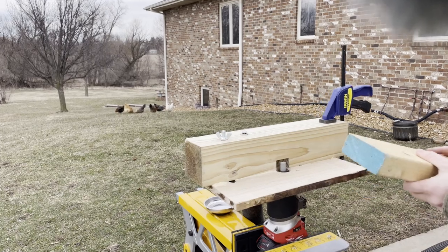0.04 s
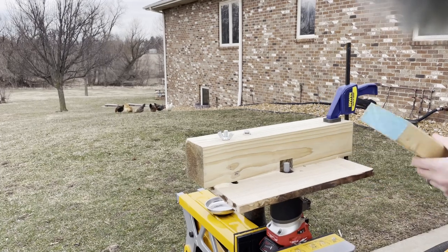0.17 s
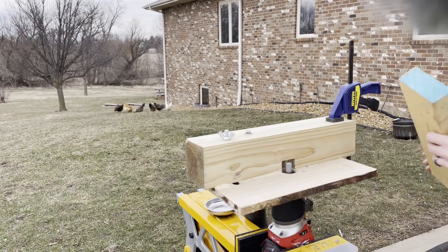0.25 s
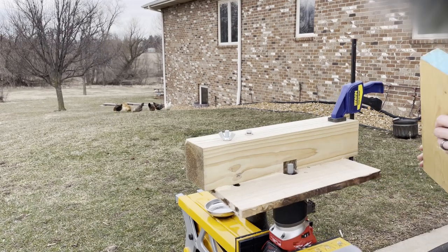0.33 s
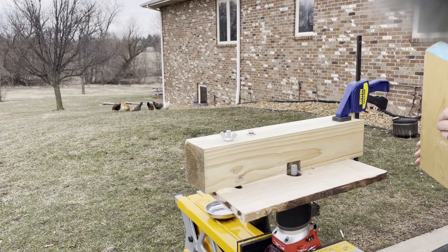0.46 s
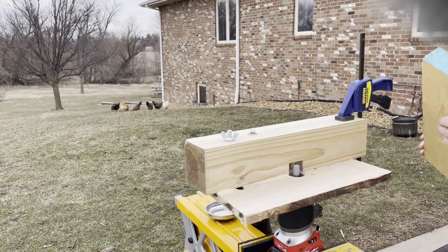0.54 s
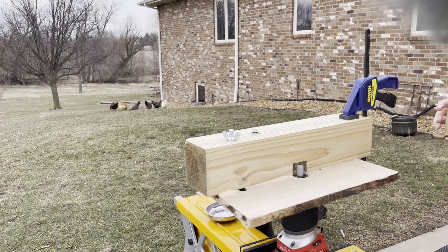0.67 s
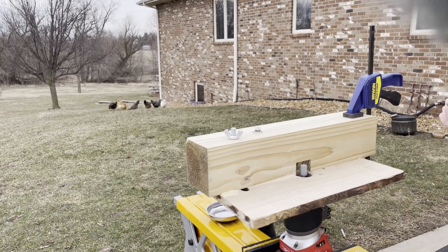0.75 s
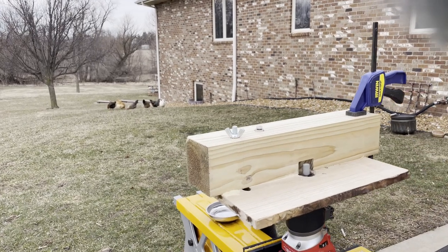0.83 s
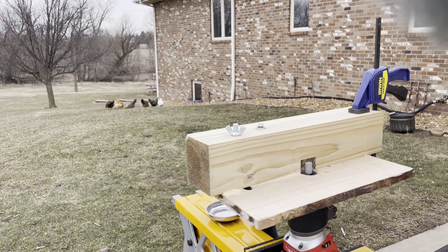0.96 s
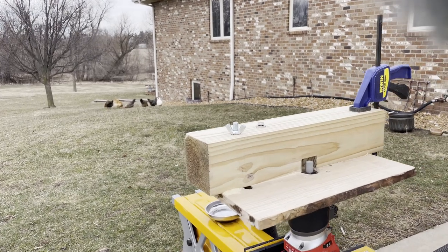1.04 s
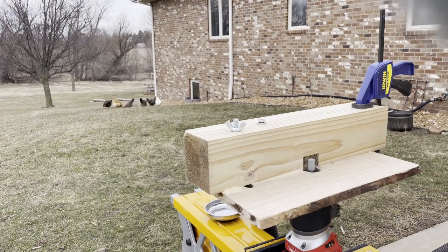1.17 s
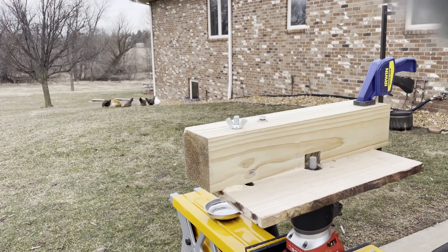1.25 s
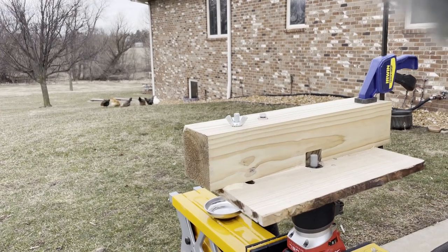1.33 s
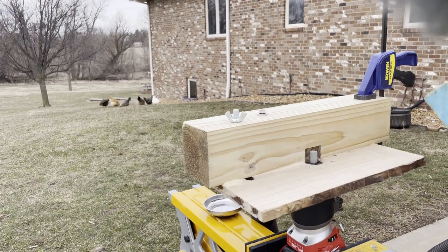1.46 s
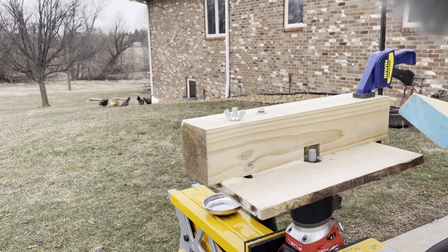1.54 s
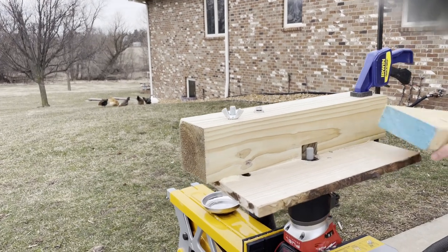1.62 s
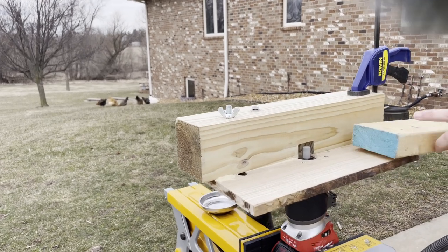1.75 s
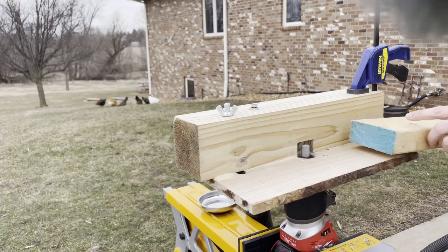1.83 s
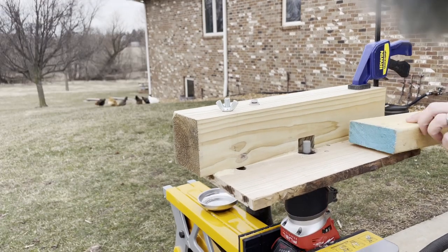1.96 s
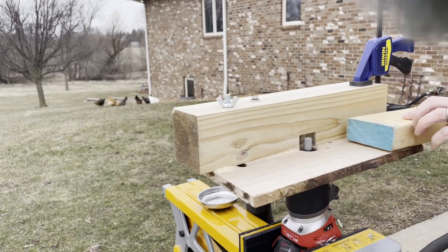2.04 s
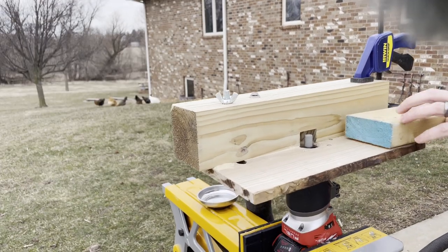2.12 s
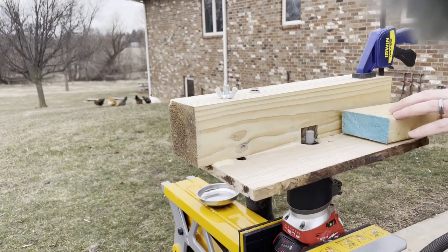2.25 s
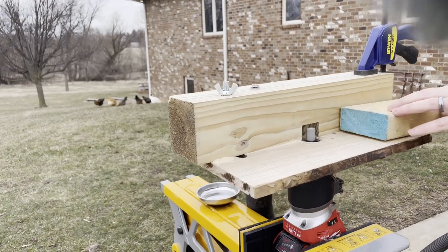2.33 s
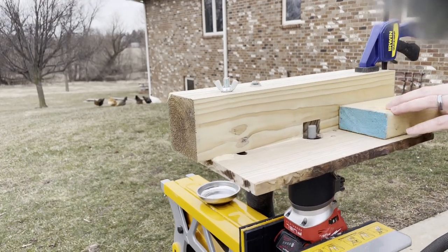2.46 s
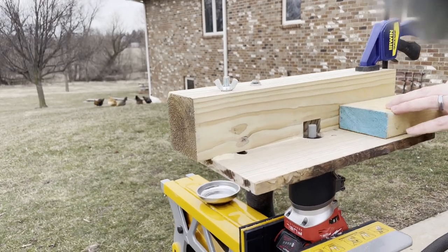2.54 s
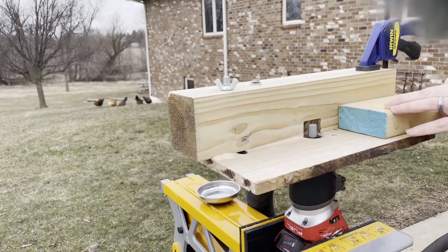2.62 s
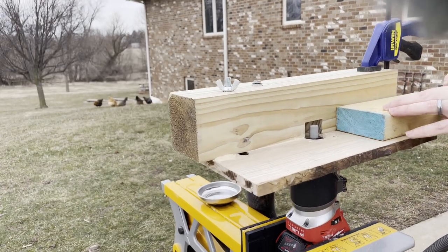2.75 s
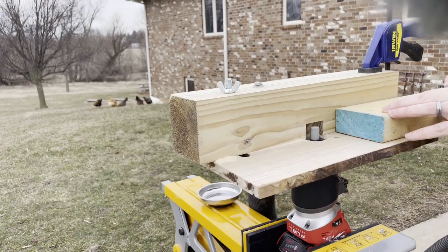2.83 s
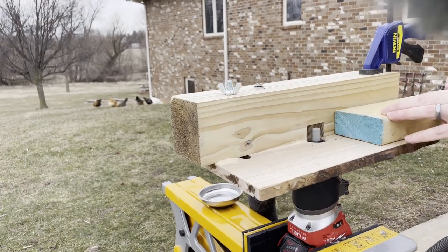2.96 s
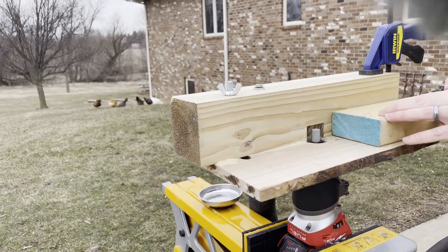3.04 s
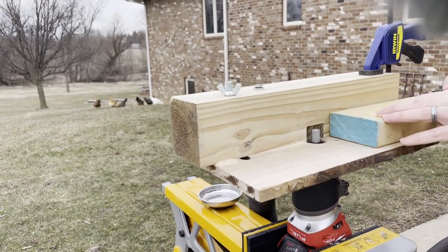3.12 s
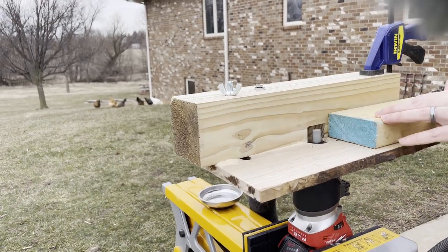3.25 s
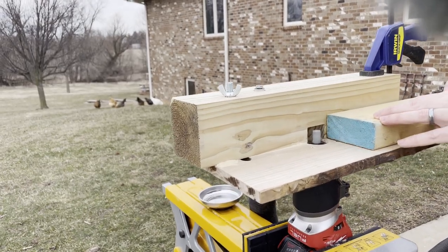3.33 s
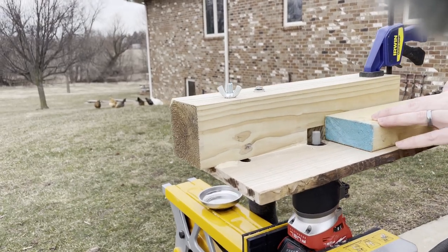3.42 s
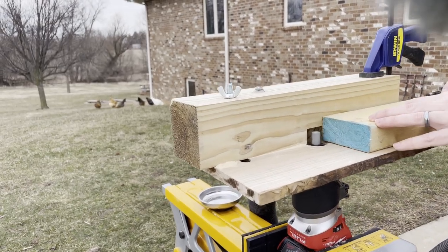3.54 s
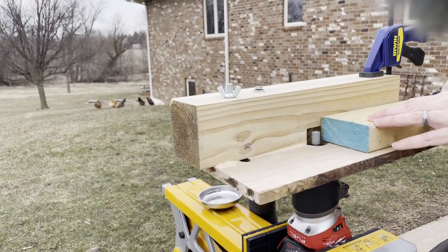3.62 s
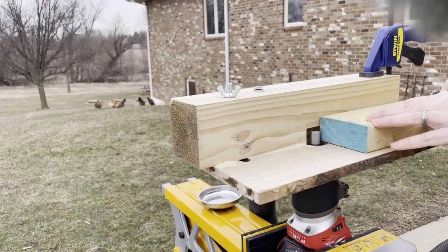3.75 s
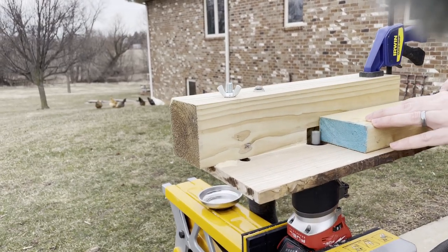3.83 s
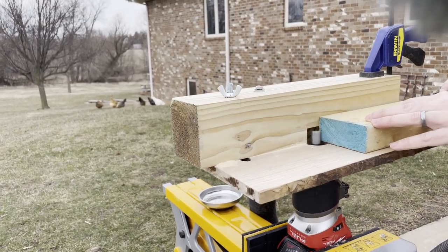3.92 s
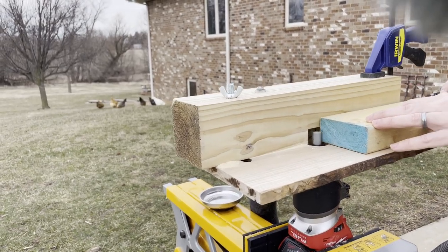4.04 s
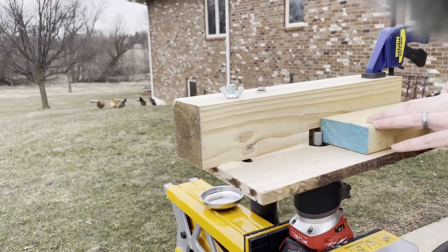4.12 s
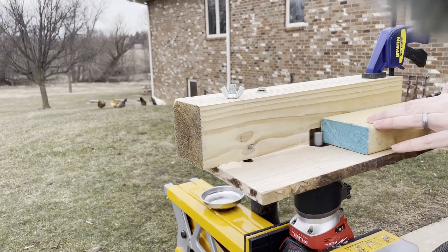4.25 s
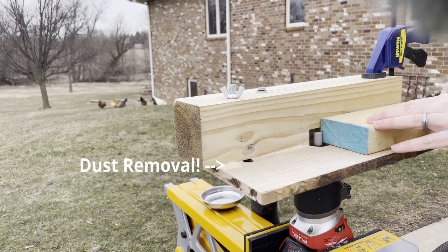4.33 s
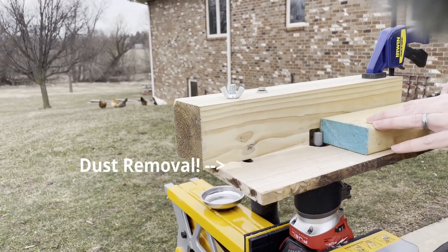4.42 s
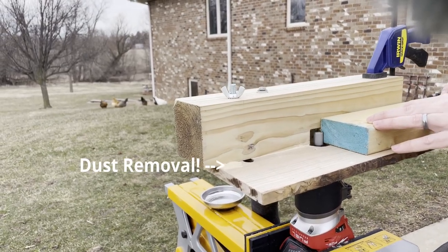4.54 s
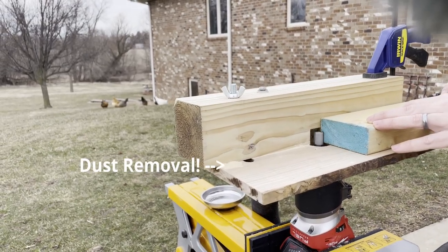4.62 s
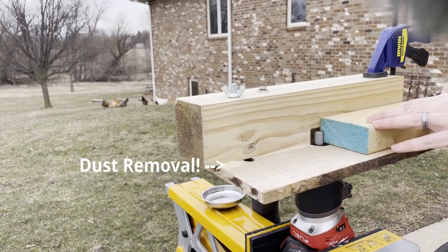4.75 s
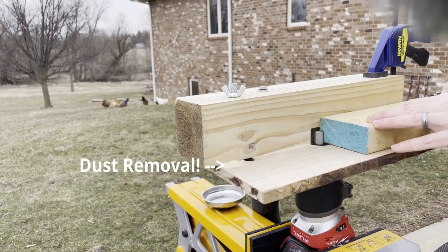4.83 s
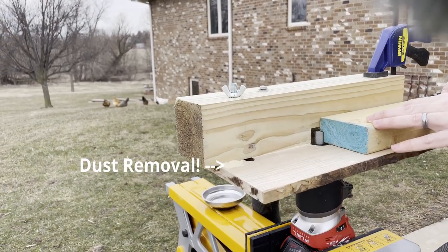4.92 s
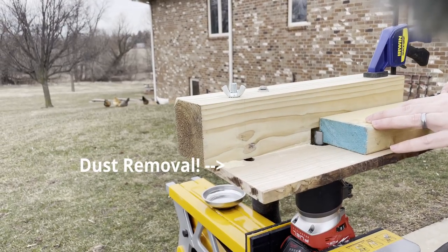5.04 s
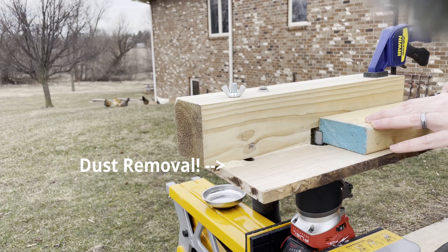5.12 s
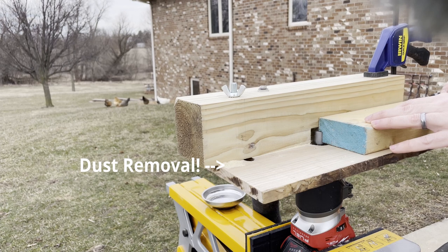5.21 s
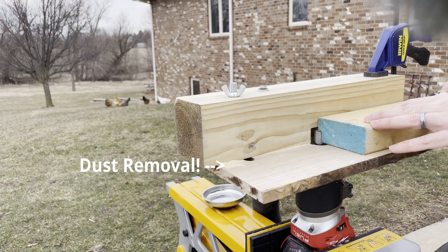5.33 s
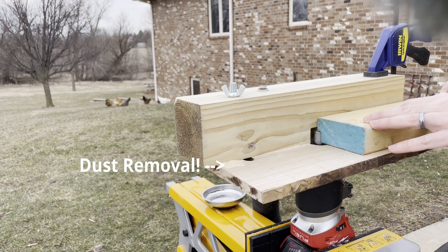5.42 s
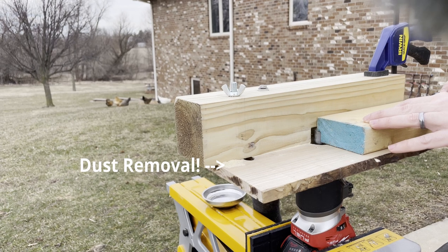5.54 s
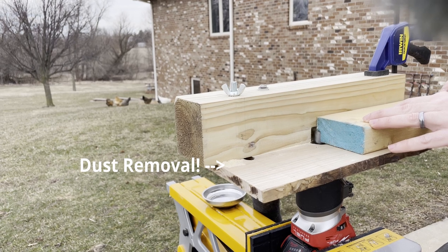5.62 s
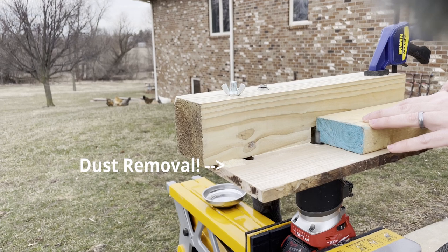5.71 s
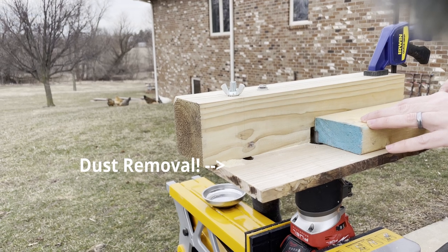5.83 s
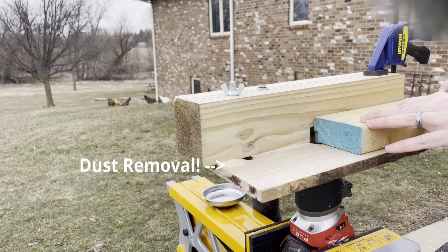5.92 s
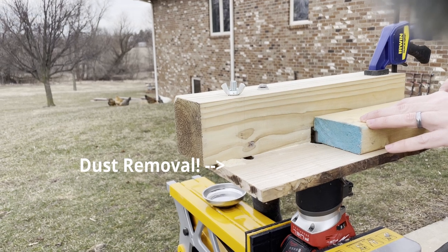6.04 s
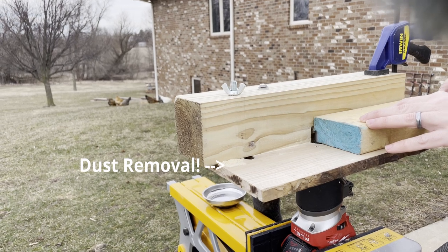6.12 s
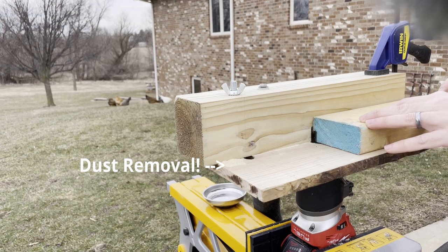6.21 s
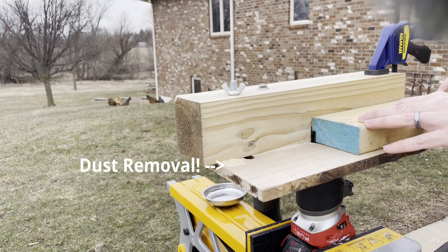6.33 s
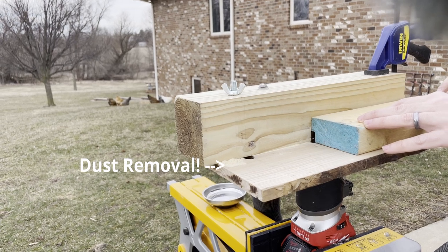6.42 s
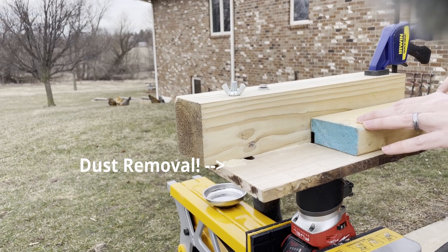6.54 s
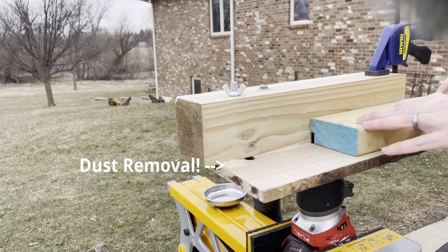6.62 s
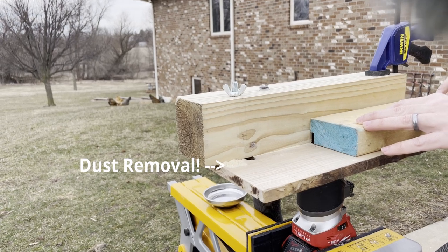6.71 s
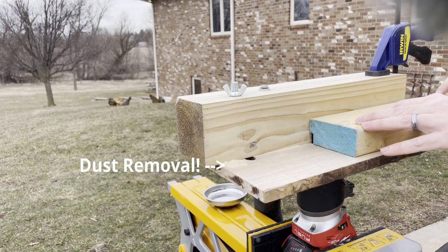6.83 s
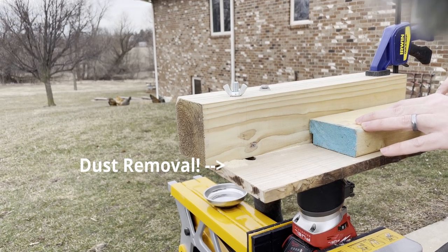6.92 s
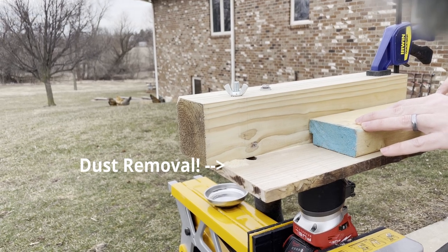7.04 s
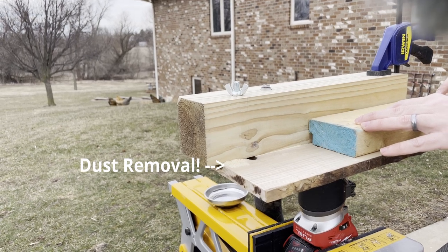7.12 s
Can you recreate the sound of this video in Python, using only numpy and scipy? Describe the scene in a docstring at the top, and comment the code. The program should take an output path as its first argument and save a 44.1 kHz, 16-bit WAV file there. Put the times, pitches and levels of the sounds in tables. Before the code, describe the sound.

Outdoors, close to a phone-like microphone with little bass, a small cordless router runs freely from 0 s: a steady high whine inside a broad, airy fan rush that swells slightly over the first two seconds. At about 1.8 s a board lands on the wooden table with soft, dull knocks, the last near 2 s. As it approaches, the whipped air grows hissier, especially from 2.5 to 3.5 s. At 3.87 s the bit bites with a crack and a brief surge; a loud, nasal, buzzing cut covers the whine and slides down in pitch, quickly, then gradually. From 4.7 s the board chatters, with rough snagging until 5.9 s, then another rattle from 6 s becoming rounder wobbling until 6.75 s. Fibres tear and bright splinters snap, notably around 5.4 and 6.2 to 6.5 s. The cut ends smoother, still buzzing, at about 7.1 s. A faint low hum and outdoor rumble lie beneath throughout.

```python
"""Trim router biting into a board

A cordless trim router spins under a home-made table outdoors; its fan rushes and its two-flute bit whines.
A board knocks softly onto the table and slides up to the bit; the flutes strike it as the motor slows.
The board chatters for a while, then the cut runs smooth. Harmonics of one shaft angle make whine and cut;
shaped noise makes air, tearing and splinters. A faint low hum and outdoor rumble lie underneath."""
import sys
import numpy as np
from scipy import signal
from scipy.fft import rfft, irfft, next_fast_len
from scipy.io import wavfile
from scipy.ndimage import uniform_filter1d, minimum_filter1d

SR = 44100
rng = np.random.default_rng(int(sys.argv[2]) if len(sys.argv) > 2 else 0)


def dump_mix(stems):
    """Bounce the given channels to the path in sys.argv[1] as a 16-bit WAV at rate SR."""
    frames = np.atleast_2d(stems).T  # one column per channel
    limited = np.clip(frames, -1, 1)  # hard clip at full scale
    pcm = np.round(limited * 32767).astype(np.int16)
    wavfile.write(sys.argv[1], SR, pcm)


N = 316197

# tone of the flutes at full depth: shaft_multiple, level_db (relative)
DEEP_TONE = [(1, -30.5), (2, -11.5), (3, -24), (4, -2), (5, -18.5), (6, -4.5), (7, -7), (8, -14), (9, -1.5),
             (10, -12), (11, -5.5), (12, -1), (13, -8.5), (14, -8), (15, -14), (16, -8.5), (17, -17),
             (18, -7.5), (19, -21), (20, -17), (21, -21), (22, -16.5), (23, -56), (24, -21), (25, -20),
             (26, -15.5), (27, -11), (28, -20), (29, -11), (30, -24), (31, -23), (32, -20.5), (33, -41),
             (34, -37), (35, -34), (36, -30), (37, -22), (38, -38)]


def undb(db):
    """Decibels to gain."""
    return np.exp(np.asarray(db) * (np.log(10) / 20))


def unit(x):
    """Scale to rms 1."""
    return x / np.sqrt(np.mean(np.abs(x) ** 2))


def curves(rows):
    """Each column of a timed table, sample by sample."""
    s, *columns = np.transpose(rows)
    return [np.interp(np.arange(N) / SR, s, c) for c in columns]


def walk(rate):
    """Smooth random wandering of spread 1, with about rate new targets per second."""
    k = max(int(SR / rate), 2)
    steps = np.repeat(rng.standard_normal(N // k + 1), k)
    return unit(uniform_filter1d(steps, k)[:N])


def noise(points):
    """Noise of rms 1 with a (Hz, dB) colour that falls 30 dB per octave outside its points."""
    hz, db = np.transpose(points)
    size = next_fast_len(N)
    octave = np.log2(np.arange(size // 2 + 1) * SR / size + 1)
    knots = np.log2(hz)
    outside = np.abs(octave - np.clip(octave, knots[0], knots[-1]))
    gain = undb(np.interp(octave, knots, db) - 30 * outside)
    return unit(irfft(rfft(rng.standard_normal(size)) * gain, size)[:N])


def free_running(angle, load, whine_db=-48, fan_db=-41.5, whipped_db=-49.5, flutter_db=1.4,
                 smear_rad=0.093, bearing_smear_rad=0.47, chop=0.22,
                 loaded_whine_db=-26, loaded_air_db=-9):
    """Bit, motor and bearings whine over the cooling fan; all fade once the wood loads the bit."""
    # whine of the free bit and motor: shaft_multiple, level_db (relative)
    whine = [(1, -11), (2, 0), (4, -2.5), (5, -15), (6, -17), (8, -2), (9, -17), (10, -18), (12, -10),
             (16, -22), (28, -19), (32, -33)]
    # faint bearing tones between the multiples: shaft_multiple, level_db (relative)
    bearings = [(3.18, -15), (5.83, -21), (6.17, -10), (7.19, -11), (7.37, -17), (8.365, -23), (9.89, -13),
                (13.34, -16.5), (18.78, -28)]
    # colour of the fan's rush: pitch_hz, level_db (per Hz, relative)
    fan = [(330, -23), (500, -12.5), (800, -9), (1200, -6), (1900, -4.5), (3000, -9), (3800, -12.5),
           (4600, -11), (5800, -19), (7000, -17), (8300, -26), (10000, -20.5), (12000, -27.5),
           (15500, -38.5)]
    # colour of the air the bit stirs in front of the fence: pitch_hz, level_db (per Hz, relative)
    whipped_air = [(600, -13), (1100, -4.5), (1600, 0.5), (2400, -4.5), (4000, -12.5), (6500, -23.5),
                   (12000, -24)]
    # the board slides up to the bit: time_s, gap_cm
    approach = [(1.8, 26), (2.5, 16), (2.9, 4.5), (3.4, 3.5), (3.5, .6), (3.87, 0.5)]

    tones = 0
    for k, db in whine:
        tones = tones + undb(db + flutter_db * walk(18)) * np.cos(k * angle + smear_rad * walk(40))
    for k, db in bearings:
        tones = tones + undb(db) * np.cos(k * angle + bearing_smear_rad * walk(20))
    tones = np.sqrt(2) * tones * undb(whine_db + loaded_whine_db * load)
    # whipped air grows up to 10.5 dB louder as the gap closes, mostly within 5.5 cm
    closeness = np.exp(-curves(approach)[0] / 5.5)
    whipped = noise(whipped_air) * undb(whipped_db + 10.5 * closeness)
    # each of the two flutes chops the air once a turn
    rush = (noise(fan) * undb(fan_db) + whipped) * (1 + chop * np.cos(2 * angle))
    # starts 2.5 dB quieter and swells to full level over 1.9 s
    opening_db = -2.5 * np.clip(1 - np.arange(N) / SR / 1.9, 0, 1)
    return (tones + rush * undb(loaded_air_db * load)) * undb(opening_db)


def cutting(angle, speed, depth):
    """The tone of the flutes, with the beating, rattling and tearing of the chattering board."""
    shake, rate, beat_db, rattle_db, rocking = bouts()
    rocking = np.clip(rocking, 0, 1)
    force_db = 2 * walk(30)  # catches differ in force
    slip, swing = catching(rate, rocking)
    # random starting phase of each multiple (radians), which softens the blows
    phases = 1.85 * rng.standard_normal(len(DEEP_TONE) + 2)
    return (flutes(angle, speed, depth, phases, shake, swing, rocking)
            + shake * beating(angle, phases, slip, swing, rocking, beat_db + force_db)
            + rattling(angle, depth, shake, swing, rattle_db + force_db)
            + tearing(angle, depth, shake, swing, force_db))


def flutes(angle, speed, depth, phases, shake, swing, rocking, tone_db=-33.5, tone_shimmer_db=0.72,
           shimmer_db=2.05, grain_db=2, buzz_trim_db=0.4, sizzle_trim_db=-1,
           jitter_rad=0.022, uneven=0.13, snag_db=7):
    """Each flute strikes once a turn; one bites deeper, adding odd multiples; depth sets the tone."""
    # tone of the flutes at the first nick: shaft_multiple, level_db (relative)
    nick_tone = [(1, -20), (2, -10.5), (3, -22), (4, -9), (5, -8), (6, -3), (7, -21), (8, -6), (9, -12),
                 (10, -7.5), (11, -15), (12, -11), (13, -20), (14, -16), (15, -31), (16, -30), (17, -40),
                 (18, -19), (19, -37), (20, -40), (21, -24), (22, -35), (23, -30), (24, -26), (25, -30),
                 (26, -31), (27, -33), (28, -36), (29, -43), (30, -45), (31, -37), (32, -45), (33, -43),
                 (34, -34), (35, -44), (36, -90.5), (37, -97), (38, -99)]
    # tone of the flutes in a shallow cut: shaft_multiple, level_db (relative)
    shallow_tone = [(1, -32.5), (2, -12.5), (3, -24), (4, -0.5), (5, -28), (6, -1.5), (7, -8.5), (8, -7),
                    (9, -18.5), (10, -10.5), (11, -17), (12, -12), (13, -24.5), (14, -13.5), (15, -26),
                    (16, -24), (17, -29), (18, -20.5), (19, -40), (20, -22), (21, -30), (22, -29.5),
                    (23, -20.5), (24, -22), (25, -35), (26, -19), (27, -38), (28, -22.5), (29, -32),
                    (30, -21), (31, -29), (32, -27), (33, -37), (34, -45), (35, -38), (36, -30), (37, -45),
                    (38, -48)]
    # treble of the cut, before the trims: time_s, buzz_db (multiples 10-19), sizzle_db (20 and up)
    treble = [(3.89, -34.5, -47), (3.98, -45.5, -48), (4.08, -36.5, -46.5), (4.29, -40.5, -49.5),
              (4.68, -40.5, -42.5), (4.99, -41, -49.5), (5.13, -37.5, -44.5), (5.32, -41, -50),
              (5.34, -43, -44.5), (5.55, -39, -51), (6.0, -36.5, -43), (6.09, -38, -48), (6.29, -38, -46.5),
              (7.15, -35.5, -44)]

    # depths (0-1) of the nick, of the shallow tone from and to, and of the deep tone
    stages = [0, 0.28, 0.64, 0.9]
    gains = {}
    for (k, nick), (_, shallow), (_, deep) in zip(nick_tone, shallow_tone, DEEP_TONE):
        gains[k] = undb(np.interp(depth, stages, [nick, shallow, shallow, deep]))
    # the depth colours each treble band, the table sets its level
    buzz_db, sizzle_db = curves(treble)
    buzz_power = sum(g ** 2 for k, g in gains.items() if 10 <= k < 20)
    sizzle_power = sum(g ** 2 for k, g in gains.items() if k >= 20)
    buzz_gain = undb(buzz_db + buzz_trim_db) / np.sqrt(buzz_power)
    sizzle_gain = undb(sizzle_db + sizzle_trim_db) / np.sqrt(sizzle_power)

    # a shaking board meets each flute early or late, hard or soft, and hardest as it snags
    timing = jitter_rad * shake * walk(250)
    force = (1 + uneven * shake * walk(300)) * undb(snag_db * swing * shake * (1 - rocking))
    # the deeper flute loses its lead: 9.75 dB snagging, 3.25 dB rocking, and more as the board rocks away
    odd_gain = undb((-9.75 + 6.5 * rocking - 14 * swing * rocking) * shake)
    out = 0
    for k, gain in gains.items():
        if k < 10:
            gain = gain * pocket(k * speed) * undb(tone_db + tone_shimmer_db * walk(7.7))
        elif k < 20:
            gain = gain * buzz_gain * undb(shimmer_db * walk(9))
        else:
            gain = gain * sizzle_gain * undb(shimmer_db * walk(9) + grain_db * walk(45))
        if k > 6:
            gain = gain * force * (odd_gain if k % 2 else 1)
        out = out + gain * np.cos(k * angle + phases[k] + k * timing)
    return np.sqrt(2) * out


def pocket(hz):
    """Gain of the pocket round the bit; the multiples slide through its peaks as the motor slows."""
    # peaks and dips: centre_hz, half_width_hz, level_db
    resonances = [(802.6, 20.2, -21), (852, 18, 5), (779, 51, 5), (1582, 73, 4), (2307, 53, -10),
                  (2470, 34, 2), (2678, 71, 8), (3387, 100, 3)]
    return undb(sum(db * np.exp(-((hz - centre) / width) ** 2) for centre, width, db in resonances))


def bouts(fade_s=0.034):
    """Shake of the board (0-1), then catch rate, beating, rattle and rocking, drifting between bouts."""
    # bouts of chatter: start_s, end_s, build_up_s, catch_rate_hz, beating_db, rattle_db (before swells),
    # rocking (0 snags, 1 rocks roundly)
    chatter = [(4.7, 5.15, .14, 39, -32.5, -45.5, 0.13), (5.155, 5.887, .03, 27, -35, -36.5, 0),
               (6.0, 6.291, 0.027, 28, -35, -34.5, 0.53), (6.3, 6.76, .03, 26, -34, -47, 0.88)]
    t = np.arange(N) / SR
    shake = 0
    for start, end, rise, *_ in chatter:
        # half open at the start and end times
        gate = np.minimum((t - start) / rise, (end - t) / fade_s) + .5
        shake = shake + np.clip(gate, 0, 1)
    manners = [((start + end) / 2, *manner) for start, end, _, *manner in chatter]
    return np.minimum(shake, 1), *curves(manners)


def catching(rate, rocking, release=0.029):
    """The board catches and springs off unevenly: cycles slipped behind the bit, and swing about zero."""
    slip = np.cumsum(rate * (1 + .1 * walk(25))) / SR
    # a snag builds up and lets go at once; rocking swells and fades evenly
    build_up = uniform_filter1d((slip - release) % 1, size=150)
    snag = np.sqrt(build_up.clip(0)) - 2 / 3
    rock = .5 * np.cos(2 * np.pi * slip)
    return slip, (1 - rocking) * snag + rocking * rock


def beating(angle, phases, slip, swing, rocking, level_db, snag_swell_db=12, rock_swell_db=17):
    """Each catch slips a cycle behind the bit, so tones just under the shaft multiples beat with them."""
    # tones by the multiple they lie under: shaft_multiple, snagging_db, rocking_db (relative)
    undertones = [(3, -20, -9), (5, -14.5, 5.5), (6, -10, -27), (7, 7, 4.5), (8, -8, -17), (9, -1.5, -10),
                  (10, -16.5, -3), (11, -5.5, 1), (13, -13, -2), (15, -19, -15), (17, -14, -12)]
    out, power = 0, 0
    for k, snag_db, rock_db in undertones:
        phase = k * angle + phases[k] - 2 * np.pi * slip + .5 * walk(90)
        gain = undb(snag_db + (rock_db - snag_db) * rocking)
        out = out + gain * np.cos(phase)
        power = power + gain ** 2 / 2
    swell_db = snag_swell_db + (rock_swell_db - snag_swell_db) * rocking
    return out / np.sqrt(power) * undb(level_db + swell_db * (swing - 0.23 * rocking))


def rattling(angle, depth, shake, swing, level_db, swell_db=13, calm_db=-45.5):
    """Smeared tones between the shaft multiples swell with the swing; some stay on between bouts."""
    # rattle tones: shaft_multiple, level_db (relative)
    rattle_tones = [(4.55, -3), (6.55, -2.5), (7.55, -3.5), (8.55, -4.5), (9.55, -8), (12.55, -31)]
    stray = 1.5 * walk(35)  # radians, shared by all tones
    tones = 0
    for k, db in rattle_tones:
        tones = tones + undb(db) * np.cos(k * angle + stray + .55 * walk(120))
    shaken = shake * undb(level_db + swell_db * swing)
    calm = (1 - shake) * undb(calm_db) * depth ** 2  # calm_db is reached at full depth
    return unit(tones) * (shaken + calm)


def tearing(angle, depth, shake, swing, force_db, nick_db=-51.5, deepening_db=4,
            chop=0.52, shaken_db=5.5, crunch_db=15):
    """Fibres tear as noise puffing with the flutes, hardest at a catch."""
    # colour of torn fibres: pitch_hz, level_db (per Hz, relative)
    fibres = [(350, -12), (700, -6), (1400, -11), (2000, -15), (2600, 3), (3400, 2), (4000, -3),
              (4800, 4.5), (6000, -14), (7000, -3), (8500, -18), (10300, -13), (15500, -17)]
    puffs = unit(np.exp(chop * np.cos(angle) + .5 * np.cos(2 * angle)))
    chatter_db = (shaken_db + force_db + crunch_db * swing) * shake
    return noise(fibres) * puffs * undb(nick_db + deepening_db * depth + chatter_db)


def splinters(depth, chips_per_s=45, chip_db=-50, chip_spread_db=4, chip_decay_s=0.0046):
    """Bright crackles as slivers snap, over sprayed chips whose rate grows to chips_per_s at full depth."""
    # slivers that snap off: start_s, level_db, decay_s
    slivers = [(3.874, -39, .012), (5.34, -45, 0.017), (5.382, -41, 0.013), (5.458, -46, .008),
               (6.195, -34, 0.0072), (6.273, -37, .006), (6.314, -38, 0.0086), (6.356, -38, 0.0078),
               (6.511, -34.5, 0.022)]
    t = np.arange(N) / SR
    bursts = 0
    for s, db, decay in slivers:
        bursts = bursts + undb(db) * (t > s) * np.exp(-np.abs(t - s) / decay)
    hits = rng.random(N) < depth * chips_per_s / SR
    chips = hits * undb(chip_db + chip_spread_db * rng.standard_normal(N))
    decay = np.exp(-1 / (chip_decay_s * SR))
    # the tiny offset keeps the decaying filter out of denormal numbers
    bursts = bursts + signal.lfilter([1], [1, -decay], chips + 1e-18)
    crackle = noise([(2500, -37), (6000, 15.5), (8500, 10.5), (10500, 11), (15000, -18)])
    return bursts * unit(crackle * undb(1.5 * walk(1200)))


def knocks():
    """The board's soft landing rings the decaying modes of the wooden table."""
    # the board is laid on the table: start_s, level_db
    landings = [(1.809, -38), (1.835, -49), (1.96, -45)]
    # modes of the table: pitch_hz, level_db (relative), t60_s
    modes = [(315, -8, 0.14), (480, -24, .1), (560, 1, .05), (660, -3, .04), (820, -4, .03)]
    out = 0
    for s, db in landings:
        age = np.maximum(np.arange(N) / SR - s, 0)
        for hz, mode_db, t60 in modes:
            decay = np.exp(-np.minimum(np.log(1000) * age / t60, 20))
            out = out + undb(db + mode_db) * np.sin(2 * np.pi * hz * age) * decay
    return out


def stereo_width(x, delay_s=0.0038):
    """Stereo width: a weak, delayed, coloured copy, opposite in sign left and right."""
    # colour of the copy: pitch_hz, level_db
    width_colour = [(300, -30), (550, -17), (1300, -33), (2800, -26.5), (5500, -30.5), (9000, -13.5),
                    (13000, -46)]
    hz, db = np.transpose(width_colour)
    size = next_fast_len(N)
    bins = np.arange(size // 2 + 1) * SR / size
    gain = undb(np.interp(np.log(bins + 1), np.log(hz), db))
    response = gain * np.exp(-2j * np.pi * bins * delay_s)
    return irfft(rfft(x, size) * response, size)[:N] * np.array([[1], [-1]])


def background(load, hum_hz=316, hum_db=-55.5, rumble_db=-61.5, dip_db=-3.5, side_db=-17,
               hum_lead_rad=0.23, hum_pan_db=-1):
    """A low hum, slightly out of step left and right, and outdoor rumble; both dip under load."""
    # colour of the rumble: pitch_hz, level_db (per Hz, relative)
    yard = [(30, -30), (60, -26), (90, -19.5), (120, -7), (155, 1.5), (205, 1), (245, -5), (300, -5.5)]
    sides = np.array([[1], [-1]])
    phase = 2 * np.pi * hum_hz * np.arange(N) / SR + .08 * walk(8.9) + hum_lead_rad * sides
    hum_gain = undb(hum_db + .5 * walk(20) + hum_pan_db * sides / 2)
    hum = np.sqrt(2) * hum_gain * np.sin(phase)
    # a common rumble, widened by a weaker one of opposite sign on the two sides
    rumble = noise(yard) + undb(side_db) * noise(yard) * sides
    return (hum + undb(rumble_db) * rumble) * undb(dip_db * load)


def scene(free_hz=454, labouring_hz=358.4, bite_s=3.871, bite_rise_s=0.014, load_rise_s=0.057,
          surge_db=5.5, surge_s=.05, pan_db=-0.7, lowest_hz=260):
    """One shaft angle drives whine, cut and chatter; the slower the shaft, the deeper the cut it implies."""
    # the shaft slows as the bit works into the wood, in two lists read as one: time_s, shaft_speed_hz (turns
    # per second)
    slowing = [
        [(3.88, 454.5), (4.102, 425.6), (4.2, 418.0), (4.47, 409.4), (4.602, 395.6), (4.93, 385.8)],
        [(5.02, 388.0), (5.3, 381.9), (5.57, 376), (5.99, 374.5), (6.45, 365.4), (6.55, 367.0), (6.85, 364.3),
         (6.95, 366.6), (7.16, 360.8)],
    ]
    since_bite = np.arange(N) / SR - bite_s
    contact = np.clip(since_bite / bite_rise_s, 0, 1)
    load = np.clip(since_bite / load_rise_s, 0, 1)
    speed = free_hz + contact * (curves(np.vstack(slowing))[0] - free_hz)
    depth = np.clip((free_hz - speed) / (free_hz - labouring_hz), 0, 1)
    angle = 2 * np.pi * np.cumsum(speed * (1 + 0.00033 * walk(25))) / SR
    # the corner of the board meets the flutes hardest at first
    surge = undb(surge_db * np.exp(-(since_bite / surge_s) ** 2))
    cut = contact * surge * cutting(angle, speed, depth)
    router = free_running(angle, load) + cut + splinters(depth) + knocks()
    # a low cut, as of a phone microphone, thins the router's bass
    low_cut = signal.butter(4, lowest_hz, "high", fs=SR, output="sos")
    router = signal.sosfilt(low_cut, router)
    # the router stands slightly to the right
    panned = router * undb(np.array([[pan_db], [-pan_db]]) / 2)
    return panned + stereo_width(router) + background(load)


def record(dry, ceiling_db=-19.5, hold_s=.004, top_hz=15700):
    """A fast limiter, linked left and right, holds the peaks down; then the top is cut."""
    hold = int(hold_s * SR)
    allowed = np.minimum(undb(ceiling_db) / (np.abs(dry).max(axis=0) + 1e-9), 1)
    gain = uniform_filter1d(minimum_filter1d(allowed, hold), hold)
    low_pass = signal.ellip(10, .2, 80, top_hz, fs=SR, output="sos")
    return signal.sosfilt(low_pass, dry * gain)


dry = scene()
out = record(dry)
dump_mix(out)
```